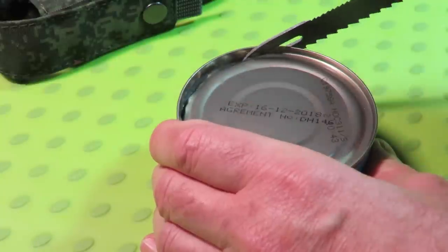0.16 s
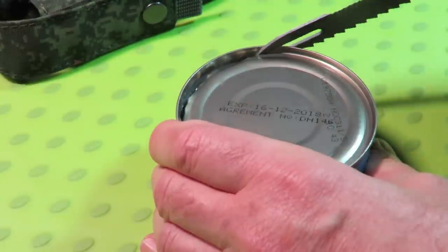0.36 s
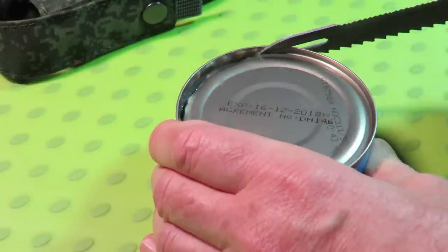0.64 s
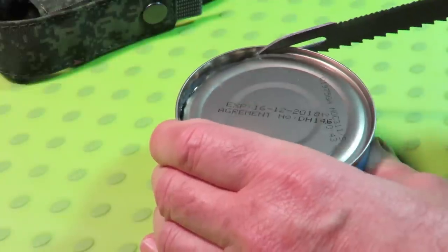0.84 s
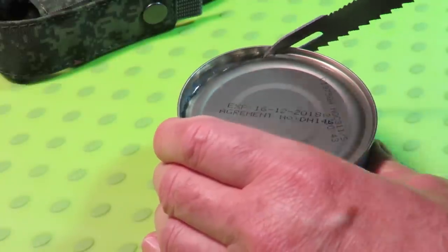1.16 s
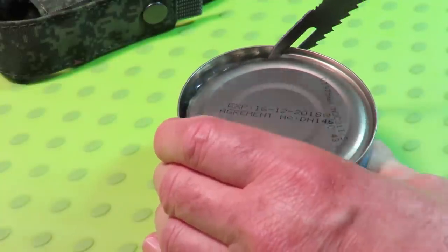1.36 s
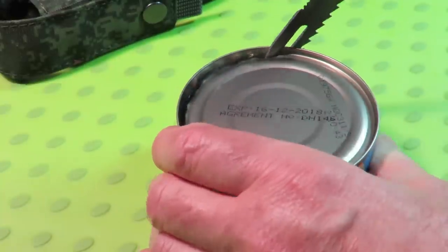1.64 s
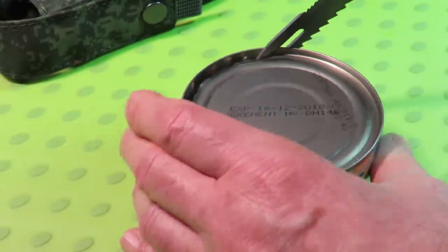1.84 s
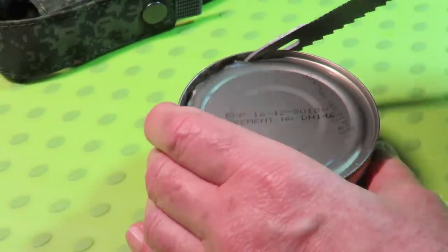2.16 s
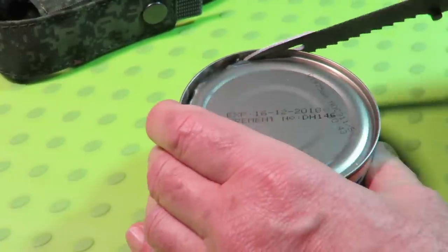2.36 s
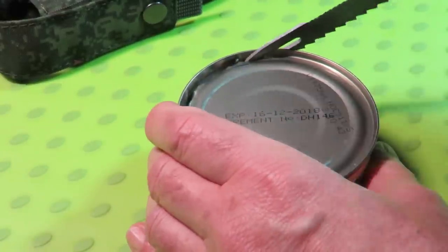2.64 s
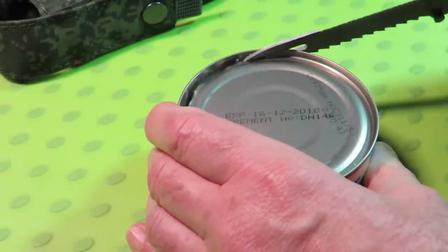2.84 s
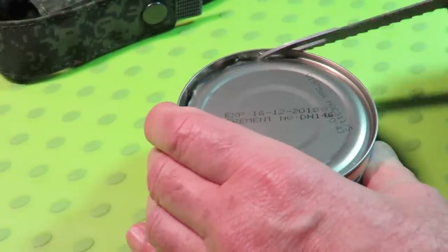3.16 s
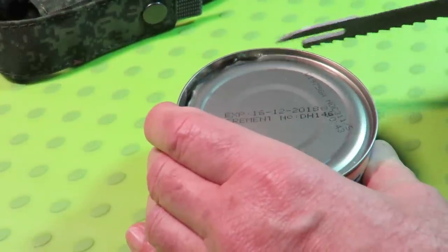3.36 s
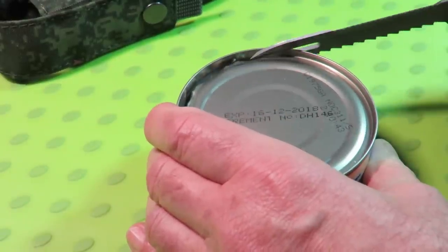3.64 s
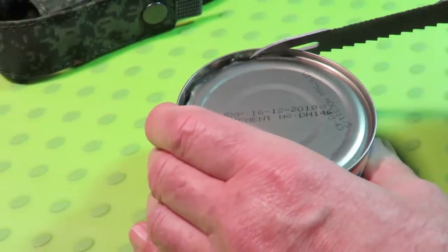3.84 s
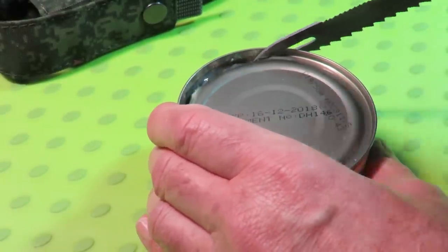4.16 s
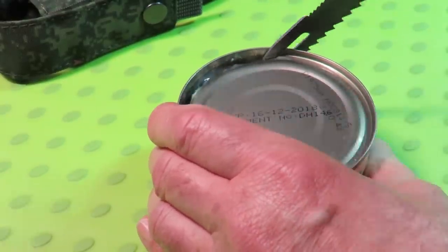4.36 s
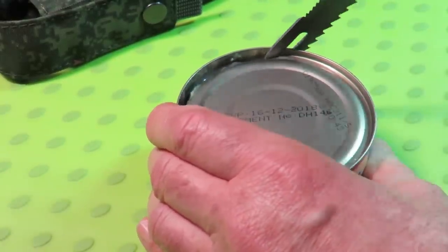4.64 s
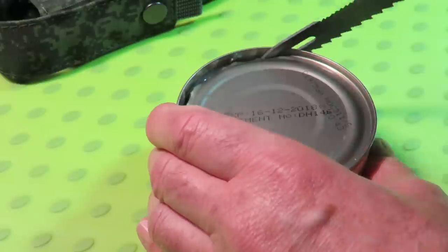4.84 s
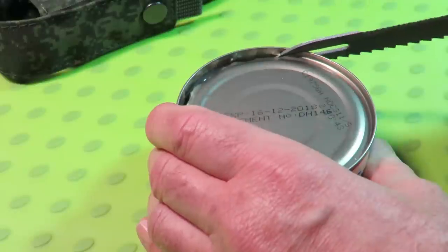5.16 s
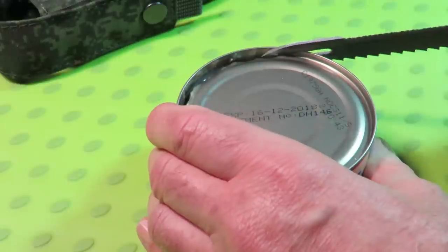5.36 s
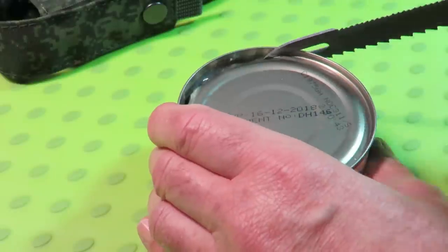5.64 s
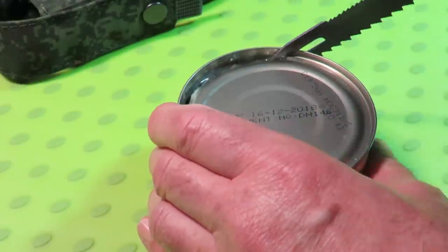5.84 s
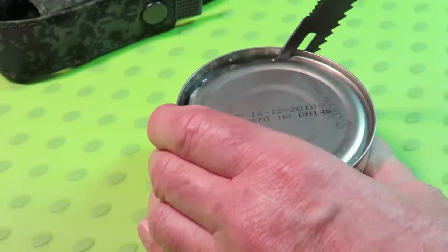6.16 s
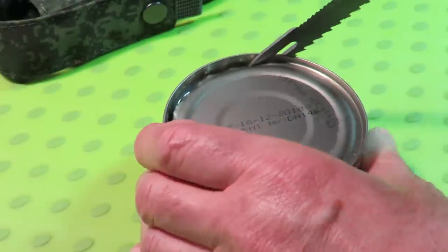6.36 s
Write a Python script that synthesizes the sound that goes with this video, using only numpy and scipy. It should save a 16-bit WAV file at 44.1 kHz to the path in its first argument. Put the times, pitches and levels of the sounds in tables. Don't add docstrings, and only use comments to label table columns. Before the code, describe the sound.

A steel blade levers round a tin can lid with sharp ringing snaps, gritty scrapes and loose knocks, over thin hiss and distant birds.

```python
import sys
import numpy as np
from scipy import signal
from scipy.io import wavfile

SR = 44100
rng = np.random.default_rng(int(sys.argv[2]) if len(sys.argv) > 2 else 0)


def master(y):
    cut = np.clip(np.atleast_2d(y).T, -1, 1)
    pcm = np.round(cut * 32767)
    wavfile.write(sys.argv[1], SR, pcm.astype(np.int16))


def volts_from_db(level):
    exponent = np.asarray(level, float) / 20
    return 10 ** exponent


N = 287091

# pitch in Hz, level in dB per Hz.
ROOM_HISS = [(30, -15.5), (70, -15), (130, -2), (270, -2), (420, -5), (1100, -9), (2000, -11.5), (3000, -3),
             (3450, -3), (4500, -3.5), (6100, -13), (7000, -8), (10300, -25.5), (13000, -10)]
# pitch in Hz, left-right likeness from 0 to 1.
ROOM_LIKENESS = [(60, 0.97), (200, 0.95), (600, 0.077), (2000, 0.99), (5000, 0.1), (8000, 0.09),
                 (12000, .02)]
# pitch in Hz, width in Hz, level in dB.
ROOM_HUMS = [(259.7, 19, -21.5), (1080, 110, -14.5), (1567, 63, -16.5), (3015, 7.9, -12.5),
             (6640, 160, -18), (7540, 230, -23.5)]
HUM_FLICKER_DB, HISS_TOP_HZ = 2.5, 14300
# pitch in Hz, width in Hz.
MIC_NOTCHES = [(3450, 650), (6050, 370), (8300, 380)]
ROOM_DB, BIRDS_DB = -52.5, -39.5
ECHO_T60_S, ECHO_DB = 0.4, -16.5

# time in seconds, gain change in dB.
DUCKS = [
    (0, -4.5),
    (0.17, 0.5),
    (2.054, -13.5),
    (2.448, -16),
    (2.667, 1.5),
    (2.982, -2.5),
    (3.7, -3),
]
RECOVER_S, RECOVER_SHAPE, LOOK_AHEAD_S = 0.75, 1.12, 0.0065
ROOM_FOLLOWS, BIRDS_FOLLOW = 1.35, 1

# time in seconds, peak in dB, pitch in Hz.
CHIRPS = [(0.0458, -28, 5140), (0.137, -30, 5470), (0.7844, -27, 4990), (0.8709, -28, 5050),
          (1.0944, -34, 5300), (3.538, -34, 5150), (3.8316, -32, 5020), (4.0552, -33, 5010),
          (4.4029, -29, 4720), (4.8973, -30, 5070), (5.1582, -26, 4930), (5.1901, -27, 5180),
          (5.3931, -31, 5050), (5.458, -35, 5050), (6.1504, -29, 5160), (6.1774, -33, 5080)]
# start in seconds, peak in dB, pitch in Hz.
TRILLS = [
    (4.1704, -26, 4910),
    (4.4253, -23.5, 4880),
    (4.711, -25, 4920),
    (4.926, -23.5, 4850),
]
TRILL_GAP_S = 0.0347
# start in seconds, length in seconds, first Hz, last Hz, level in dB.
WHISTLES = [
    (1.385, .635, 3640, 3890, -38),
    (5.27, .09, 3740, 3850, -36),
    (5.392, .035, 3960, 3960, -31),
    (5.445, .045, 3900, 3900, -38),
    (5.512, .03, 3960, 3950, -30),
    (5.565, .05, 3900, 3920, -41),
]
GLIDE_S, FADE_DB_PER_S = 0.33, 904.5
# time in seconds, gain in dB.
SWELLS = [
    (1.64, 3.5),
    (1.8, 3),
    (1.95, 0),
]
SWELL_S = 0.095

# pitch in Hz, width in Hz, level in dB.
TABLE_MODES = [(77, 20, -18), (139, 57, -7), (270.7, 38, -0.5), (427, 113, -8)]
# time in seconds, peak in dB, t60 in seconds.
THUMPS = [(0.198, -33, 0.06), (0.435, -30, 0.32), (1.029, -43, 0.093), (1.19, -30, 0.12),
          (1.501, -29, 0.12), (2.055, -32, 0.061), (2.446, -18, 0.035), (3.296, -32.5, 0.26),
          (3.379, -39.5, 0.63), (3.452, -36, 0.38), (3.635, -38, 0.12), (3.679, -15.5, 0.12),
          (3.704, -19, 0.052), (3.728, -29.5, 0.36), (3.912, -36.5, 0.12), (4.119, -38.5, 0.14),
          (4.875, -44, 0.092), (5.123, -38, 0.12), (5.197, -37, 0.18), (5.399, -31, 0.22),
          (5.449, -37, 0.28), (6.199, -33, 0.15)]
# start in seconds, length in seconds, level in dB.
RUBS = [
    (5.13, 0.12, -40),
    (5.37, 0.059, -41.5),
    (1.7, 0.11, -42),
    (3.4, 0.11, -46),
]
# low Hz, high Hz.
RUB_BAND_HZ = [180, 2120]
RUB_EDGE_DB_PER_S, RUB_BELOW_LID_DB = 294, -20.5

MODE_HZ = [470, 620, 780, 975, 1110, 1200, 1265, 1335, 1400, 1545, 1578, 1668, 1935, 2213, 2575, 2980, 3130,
           3350, 3645, 3890, 4200, 4805, 5870, 6270, 7200, 7670]
# level in dB, t60 in seconds.
MODE_DB_T60 = [(-15, 0.084), (3.5, 0.12), (-3, 0.039), (-19, 0.32), (-0.5, 0.16), (0, 0.087), (-3, 0.13),
               (1.5, 0.092), (-7, 0.14), (-17.5, 1), (-4.5, 0.26), (-4, 0.38), (-100, 0.067), (3.5, 0.15),
               (-2.5, 0.13), (7, 0.068), (-10, 0.61), (-5.5, 0.25), (-4.5, 0.22), (-20, 0.077),
               (1.5, 0.038), (-2.5, 0.17), (0.5, 0.068), (-11, 0.2), (0.5, 0.024), (-10, 0.045)]
PART_HZ = [600, 1300, 2250, 3800, 9000]
# time in seconds, lid peak in dB, then relative to it
# wall thud in dB, ring in dB, crack in dB.
BITES = [(0.1679, -1.5, -22.5, -10.5, -22), (0.4382, -12, -17, -11, -22), (1.3645, -15, -39, -5, -14),
         (2.0545, 0.5, -22.5, -15, -11.5), (2.448, -6.5, -9, 1, 0.5), (2.6665, -8, -45, -1.5, -8),
         (2.9811, -11, -14, -6, -42), (4.63, -11, -21, -17.5, -19), (4.8664, -16, -2, -6, -18.5),
         (5.0205, -24.5, -4, -4, -31), (5.1207, -30, -23, 11, -40)]
# time in seconds, lid peak in dB, then relative to it
# wall thud in dB, ring in dB, crack in dB.
KNOCKS = [
    (1.1951, -14, 5.5, 3, -12.5),
    (1.9092, -23, 1.5, -8, -26),
    (3.301, -20.5, 2, 3.5, -25),
    (3.3254, -18.5, -17, -7, -17),
    (3.46, -21.5, -2, -7, -14),
    (3.554, -29.5, -1, 4, 0),
    (3.678, -9, -57, -22, -10),
    (3.708, -11, -37, -6.5, -10.5),
    (3.9165, -24, -1, -3.5, -36),
    (6.4403, -16.5, 4.5, 0, -12),
]
BITE_RIM_DB, KNOCK_BLADE_DB = -6, -10.5
# time in seconds, wall thud peak in dB, lid in dB relative to it.
TAPS = [
    (0.5649, -12, -12),
    (1.035, -27.5, 2.5),
    (1.852, -20, 2),
    (3.6352, -18, -9.5),
    (3.7182, -17.5, -6),
    (4.1185, -27, -1),
    (4.2019, -21, -35),
    (4.893, -23, 1),
    (5.886, -21, -8.5),
]
TAP_PARTS_DB = [-22, -11, -26]
# time in seconds, lid peak in dB.
CATCHES = [
    (0.4748, -12),
    (1.4705, -10),
    (1.509, -10.5),
    (1.56, -12.5),
    (4.4653, -15.5),
    (5.9956, -14),
    (6.172, -12.5),
    (6.2115, -12),
    (6.2695, -10.5),
]
CATCH_PARTS_DB = [-16.5, -43, -16, -25]
# start in seconds, length in seconds, lid level in dB,
# then relative to it wall in dB, rim in dB.
STROKES = [(0.461, 0.043, -26.5, -13, -14), (0.559, 0.027, -21.5, -12, -22), (1.343, 0.31, -21, -13, -21),
           (1.647, 0.02, -32.5, 7.5, -4), (1.758, 0.16, -41.5, -6, -18), (3.348, 0.049, -32, -16, -9),
           (3.44, 0.084, -41, -3, -13), (3.714, 0.013, -35.5, 9.5, -2.5), (4.338, 0.27, -22.5, -21, -18.5),
           (5.147, 0.13, -40.5, -0.5, -8), (5.407, 0.028, -41.5, -12, 1), (6.012, 0.26, -27.5, -13, -15.5)]
PRESS_DB_PER_S, LIFT_DB_PER_S = 314, 352
# time in seconds, pitch in Hz, gain in dB.
SPOTS = [(0.1685, 4540, 13), (0.1685, 2213, -6), (0.1685, 1570, 3), (0.1685, 850, -7.5),
         (1.1951, 990, 20.5), (1.1951, 1360, -7), (2.0543, 1252, 5.5), (2.0543, 6100, -5),
         (2.0543, 2650, -8), (2.448, 2213, 7), (2.448, 3350, 0), (2.6668, 2213, 7.5), (2.6668, 850, -16),
         (2.6668, 3000, -7.5), (3.678, 7400, 12.5), (3.708, 7510, 17.5), (3.708, 1640, 0),
         (2.448, 780, 1.5), (2.9813, 1280, 0.5), (2.9813, 820, -28), (3.301, 1570, 6), (3.678, 1530, 10.5),
         (3.9165, 1550, 9), (4.8669, 1090, 9.5), (4.8669, 500, 1), (6.4403, 1616, 11.5), (6.4403, 775, 12),
         (6.4403, 1230, -8)]
SPOT_WIDTH = 0.068
SING_HZ, SING_DB = 2213, 5.5


def rms_one(x):
    return x / np.sqrt(np.mean(x ** 2) + 1e-20)


def filtered(x, order, hz, kind="low"):
    return signal.sosfilt(signal.butter(order, hz, kind, fs=SR, output="sos"), x)


def at_hz(points, hz):
    points = np.array(points)
    return np.interp(np.log(hz), np.log(points[:, 0]), points[:, 1])


def drift(rate_hz):
    r = np.exp(-80 * np.pi * rate_hz / SR)
    slow = signal.lfilter([1], [1, -2 * r, r * r], rng.standard_normal(N // 40 + 2002))[2000:]
    return np.interp(np.arange(N) / 40, np.arange(len(slow)), rms_one(slow))


def ring(force, hz, t60_s):
    r, w = volts_from_db(-60 / (t60_s * SR)), 2 * np.pi * hz / SR
    return signal.lfilter([.5, 0, -.5], [1, -2 * r * np.cos(w), r * r], force + 1e-18)


def dying(at, sizes, t60_s):
    steps = np.full(N, 1e-18)
    steps[at] = sizes
    return signal.lfilter([1], [1, -volts_from_db(-60 / (t60_s * SR))], steps)


def span_db(start_s, length_s, rise_db_per_s, fall_db_per_s):
    t = np.arange(N) / SR
    before_s = np.maximum(start_s - t, 0)
    after_s = np.maximum(t - start_s - length_s, 0)
    return -rise_db_per_s * before_s - fall_db_per_s * after_s


def bands(low_hz, per_octave, gain_at, like_at):
    out = 0
    edges = low_hz * 2 ** np.arange(0, np.log2(18000 / low_hz), 1 / per_octave)
    white = rng.standard_normal((2, 2, N))
    for k, (low, high) in enumerate(zip(edges, edges[1:])):
        mid, side = filtered(white[k % 2], 2, [low, high], "band")
        hz = np.sqrt(low * high)
        alike = np.clip(like_at(hz), 0, 1)
        stereo = np.sqrt(1 + alike) * mid + np.sqrt(1 - alike) * side * [[1], [-1]]
        out = out + gain_at(hz) * stereo
    return out


def ducking():
    t, gain_db = np.arange(N) / SR, 0
    for s, drop_db in DUCKS:
        recovery = np.exp(-(np.abs(t - s) / RECOVER_S) ** RECOVER_SHAPE)
        gain_db = gain_db + drop_db * (t >= s - LOOK_AHEAD_S) * recovery
    return gain_db


def room(level_db, patchy_db=3.5):
    together = drift(0.28)
    hiss = bands(25, 3,
                 lambda hz: volts_from_db(at_hz(ROOM_HISS, hz) + patchy_db * (.4 * together + drift(9))),
                 lambda hz: at_hz(ROOM_LIKENESS, hz))
    hiss = rms_one(hiss)
    air = rng.standard_normal(N) + 0.79 * rng.standard_normal((2, N))
    for hz, width_hz, hum_db in ROOM_HUMS:
        hum = rms_one(ring(ring(air, hz, 3.0 / width_hz), hz, 1.3 / width_hz))
        hiss += volts_from_db(hum_db + HUM_FLICKER_DB * drift(8.8)) * hum
    top_cut = signal.ellip(10, .5, 70, HISS_TOP_HZ, fs=SR, output="sos")
    return volts_from_db(level_db + 16) * signal.sosfilt(top_cut, hiss)


def chirp(hz, fall, length_s):
    u = np.linspace(0, 1, int(length_s * SR))
    phase = 2 * np.pi * np.cumsum(hz * (1 + fall * (.5 - u))) / SR
    return np.sin(np.pi * u) ** 2 * np.sin(phase)


def twitter(level_db, count=12):
    flock, near = 0, np.zeros(N + SR)
    for hz in np.linspace(4500, 5600, count):
        starts = (rng.random((2, N)) < 100 / SR) * rng.standard_normal((2, N))
        starts += 0.86 * starts[::-1].sum(axis=0)
        note = chirp(hz, 0.065, 0.012) * volts_from_db(-7.0 * ((hz - 5100) / 600) ** 2)
        flock = flock + signal.oaconvolve(starts, note[None], axes=1)[:, :N]
    trilled = [(s + k * TRILL_GAP_S, db, hz) for s, db, hz in TRILLS for k in range(3)]
    for s, peak_db, hz in CHIRPS + trilled:
        note = chirp(hz, 0.051, 0.023) * volts_from_db(peak_db - 6.5)
        start = int((s - .004) * SR)
        near[start:start + len(note)] += note
    return volts_from_db(level_db) * rms_one(flock) + near[:N]


def whistle():
    t, hz, level_db = np.arange(N) / SR, np.full(N, 3650.), np.full(N, -120.)
    for start, length, first_hz, last_hz, db in WHISTLES:
        glide_hz = last_hz + (first_hz - last_hz) * np.exp(-np.maximum(t - start, 0) / GLIDE_S)
        hz = np.where(t > start - .005, glide_hz, hz)
        level_db = np.maximum(level_db, db + span_db(start, length, FADE_DB_PER_S, FADE_DB_PER_S))
    level_db = level_db + sum(db * np.exp(-((t - s) / SWELL_S) ** 2) for s, db in SWELLS)
    phase = 2 * np.pi * np.cumsum(hz + 22 * drift(45.7)) / SR
    breath = drift(80) * np.sin(phase) + drift(80) * np.cos(phase)
    hoarse = .6 * np.sin(phase + [[0], [.6]]) + .75 * breath
    return 0.99 * volts_from_db(level_db + 2.6 * drift(16) + [[1.5], [-1.5]]) * hoarse


def thumps():
    push, u = np.zeros(N), np.arange(int(.3 * SR)) / SR
    for s, peak_db, t60_s in THUMPS:
        start = int(s * SR)
        push[start:start + len(u)] += volts_from_db(peak_db - 60 * u / t60_s) * np.minimum(u / 0.0054, 1)
    table = 0
    for rough, (hz, width_hz, db) in zip(rng.standard_normal((len(TABLE_MODES), N)), TABLE_MODES):
        table = table + volts_from_db(db) * rms_one(ring(ring(rough, hz, 4.1 / width_hz), hz, 0.87 / width_hz))
    return .5 * push * table


def drag_parts():
    out = np.full((3, N), -120.)
    for start, length, lid, wall, rim in STROKES:
        stroke_db = span_db(start, length, PRESS_DB_PER_S, LIFT_DB_PER_S) + lid
        out = np.maximum(out, stroke_db + np.array([[0], [wall], [rim]]))
    return out


def rubs():
    levels_db = [db + span_db(s, length, RUB_EDGE_DB_PER_S, RUB_EDGE_DB_PER_S) for s, length, db in RUBS]
    level_db = np.max(levels_db + [drag_parts()[0] + RUB_BELOW_LID_DB], axis=0)
    skin = rng.standard_normal(N) + .25 * rng.standard_normal((2, N))
    grain = skin * volts_from_db(1.26 * drift(34))
    return volts_from_db(level_db) * rms_one(filtered(grain, 2, RUB_BAND_HZ, "band"))


def echoes(x):
    u = np.arange(int(.5 * SR)) / SR
    answer = rng.standard_normal((2, len(u))) + 1.5 * rng.standard_normal(len(u))
    answer *= volts_from_db(-60 * u / ECHO_T60_S) * (u > .006)
    answer = filtered(answer, 2, 6000)
    answer /= np.sqrt(np.mean(np.sum(answer ** 2, axis=1)))
    return volts_from_db(ECHO_DB) * signal.fftconvolve(x.mean(axis=0)[None], answer, axes=1)[:, :N]


def parts_at(parts_db, hz):
    share = [np.interp(np.log(hz), np.log(PART_HZ), one) for one in np.eye(5)]
    return sum(w * part for w, part in zip(share, parts_db) if w > 0)


def blow_parts():
    rows = []
    for s, lid, thud, rings, crack in BITES:
        rows.append((s, lid + thud, lid, lid + rings + BITE_RIM_DB, lid + rings, lid + crack))
    for s, lid, thud, rings, crack in KNOCKS:
        rows.append((s, lid + thud, lid, lid + rings, lid + rings + KNOCK_BLADE_DB, lid + crack))
    for s, thud, lid in TAPS:
        rows.append((s, thud, thud + lid, *(thud + np.array(TAP_PARTS_DB))))
    for s, lid in CATCHES:
        rows.append((s, lid + CATCH_PARTS_DB[0], lid, *(lid + np.array(CATCH_PARTS_DB[1:]))))
    s, *parts = np.transpose(rows)
    return (s * SR).astype(int), parts


def spot_db(at, hz):
    gain_db = 0
    for s, near_hz, db in SPOTS:
        nearness = np.exp(-(np.log(hz / near_hz) / SPOT_WIDTH) ** 2)
        gain_db = gain_db + db * (np.abs(at / SR - s) < .005) * nearness
    return gain_db


def cracks():
    at, parts = blow_parts()
    return bands(299.6, 2.2,
                 lambda hz: 0.72 * dying(at, volts_from_db(parts_at(parts, hz)), 0.02),
                 lambda hz: .93 - .00002 * hz)


def blade_slips():
    happens = rng.random(N) < 1400 * volts_from_db(4.0 * drift(18)) / SR
    slips = happens * volts_from_db(1.53 * rng.exponential(1, N).clip(0, 5))
    return rms_one(filtered(slips * rng.choice([-1, 1], N), 4, 9000))


def tin(tear_t60_s=0.025, uneven_db=1.5):
    at, parts = blow_parts()
    lid, thud, rim = drag_parts()
    drag = [thud, lid, rim, rim - 14.0, rim - 18]
    slips = blade_slips()
    early_boost = 0.67 + 2.1 * np.minimum(dying(at, 2.44 * volts_from_db(parts[1]), 0.068), 1)
    tear, out = rng.standard_normal((3, N)), np.zeros((2, N))
    luck = rng.standard_normal((len(at), len(MODE_HZ)))
    signs = np.sign(rng.standard_normal(luck.shape))
    for k, (hz, (level_db, t60_s)) in enumerate(zip(MODE_HZ, MODE_DB_T60)):
        sizes = volts_from_db(parts_at(parts, hz) + level_db - 17.5 + spot_db(at, hz) + uneven_db * luck[:, k])
        force = 0.074 * dying(at, sizes, tear_t60_s) * tear[k % 3]
        force[at] += 1.004 * sizes * signs[:, k]
        rung = early_boost * ring(force, hz, t60_s)
        muted_db = -5.0 * (1450 < hz < 2000) + SING_DB * (abs(hz - SING_HZ) < 200.)
        drag_force = slips * volts_from_db(parts_at(drag, hz) + level_db + muted_db - 35.5)
        rung += ring(drag_force, hz, .5 * t60_s) * (-1) ** k
        pan_db = 1.5 * np.sin(0.0042 * hz) * np.array([[1], [-1]])
        out += rung * volts_from_db(pan_db)
    return filtered(out, 2, 8500)


def scene():
    gain_db = ducking()
    metal = filtered(tin() + cracks(), 3, 330, "high")
    around = room(ROOM_DB + ROOM_FOLLOWS * gain_db) + twitter(BIRDS_DB + BIRDS_FOLLOW * gain_db)
    for hz, width_hz in MIC_NOTCHES:
        passed = signal.lfilter(*signal.iirnotch(hz, hz / width_hz, fs=SR), around)
        around = around - 0.8 * (around - passed)
    near = metal + whistle()
    return near + echoes(near) + thumps() + around + rubs()


def roll_off(x):
    return signal.sosfilt(signal.butter(12, 16440, fs=SR, output="sos"), x)


def record(dry):
    mix = np.clip(dry, -.98, .98)
    return roll_off(mix)


dry = scene()
out = record(dry)
master(out)
```